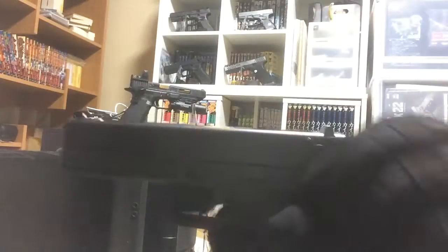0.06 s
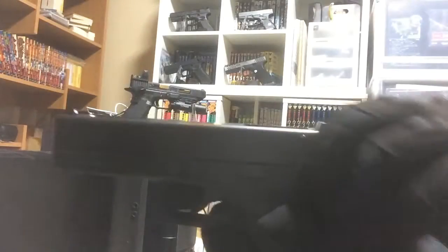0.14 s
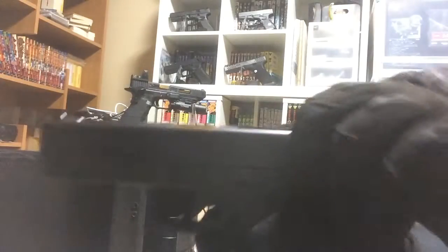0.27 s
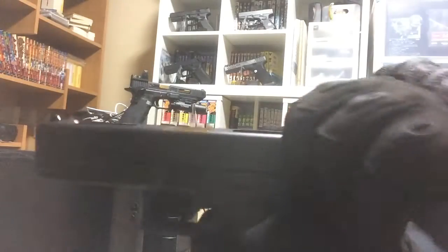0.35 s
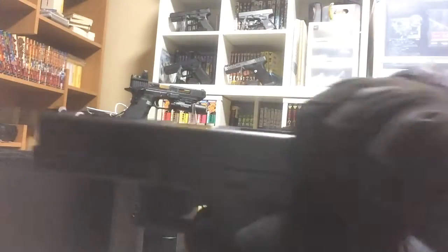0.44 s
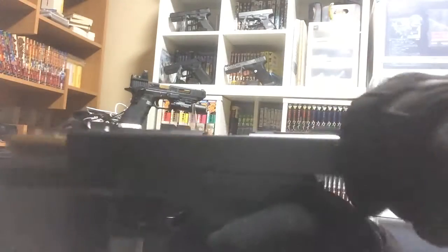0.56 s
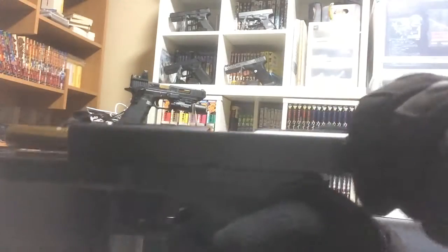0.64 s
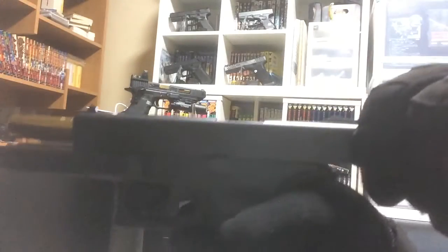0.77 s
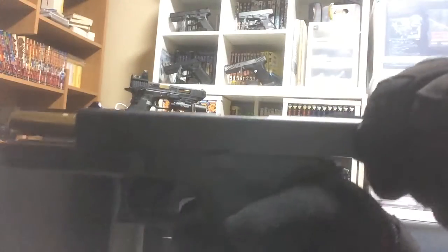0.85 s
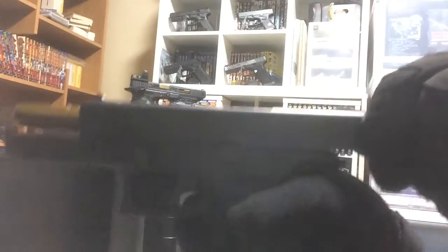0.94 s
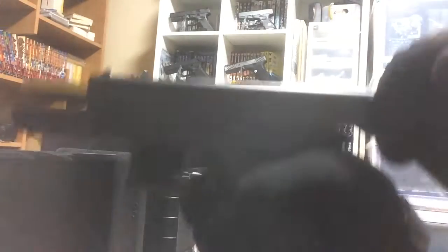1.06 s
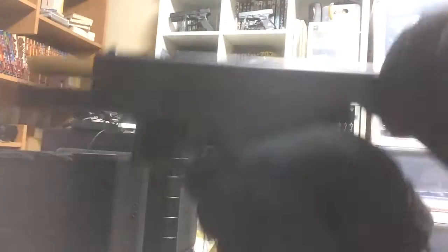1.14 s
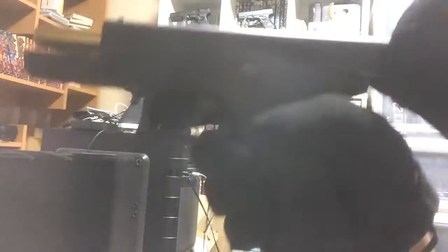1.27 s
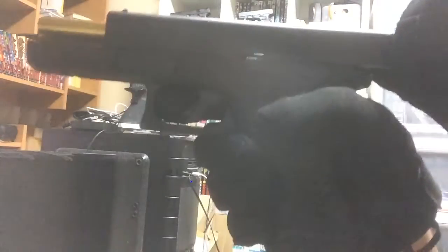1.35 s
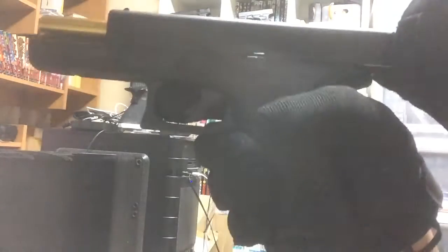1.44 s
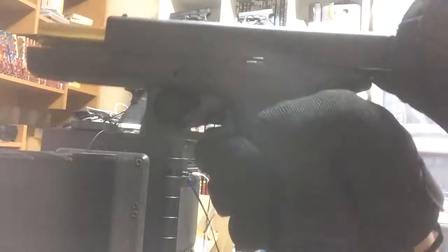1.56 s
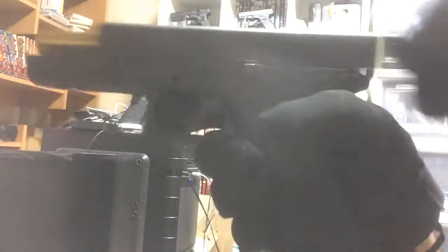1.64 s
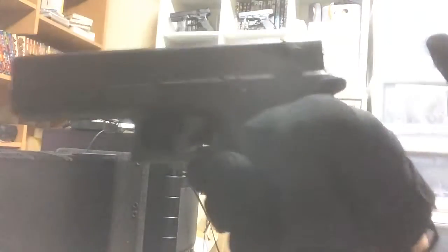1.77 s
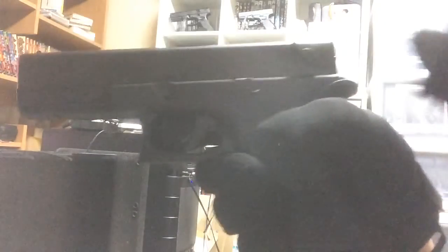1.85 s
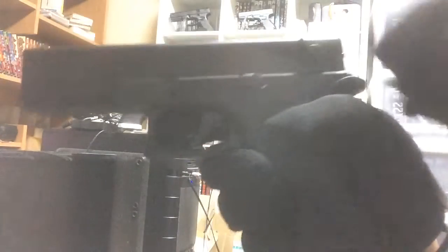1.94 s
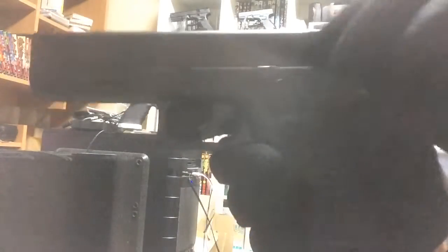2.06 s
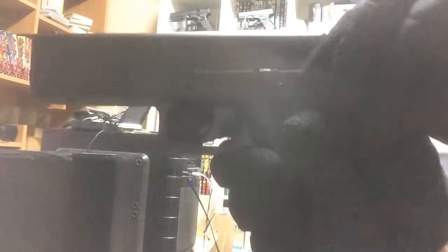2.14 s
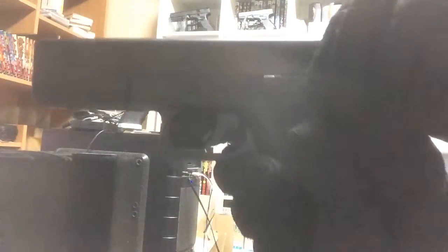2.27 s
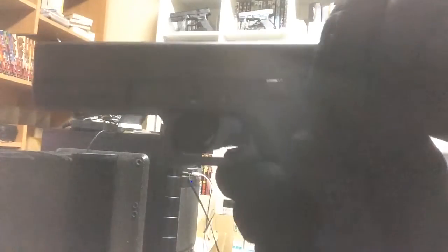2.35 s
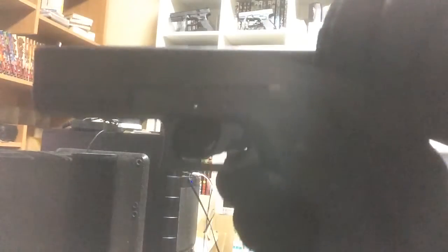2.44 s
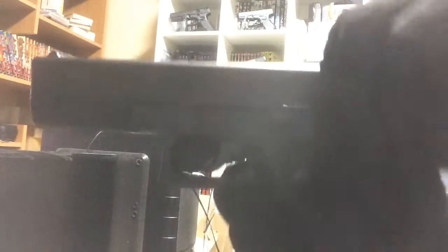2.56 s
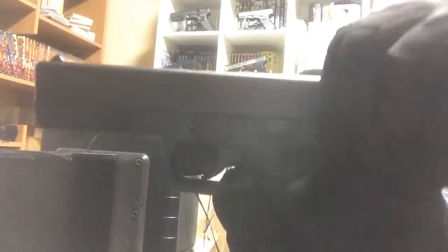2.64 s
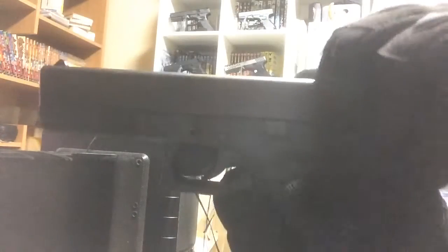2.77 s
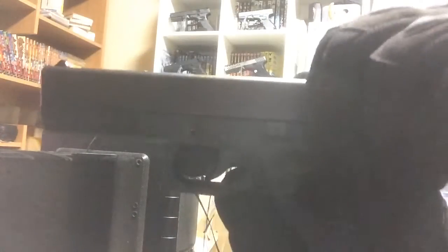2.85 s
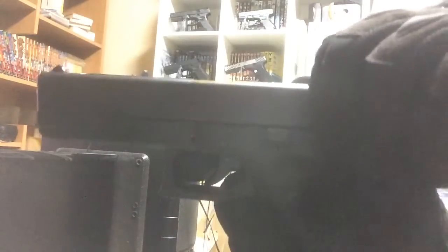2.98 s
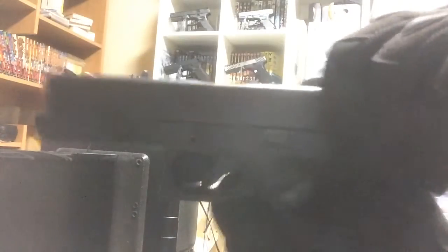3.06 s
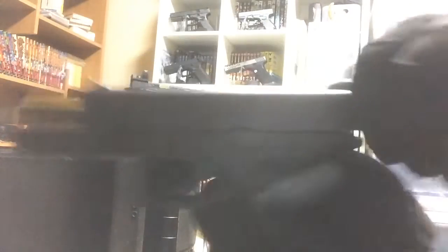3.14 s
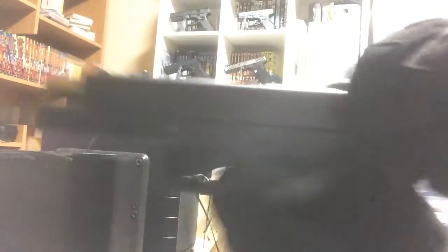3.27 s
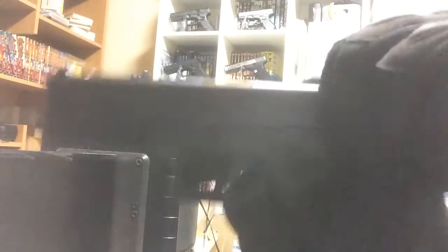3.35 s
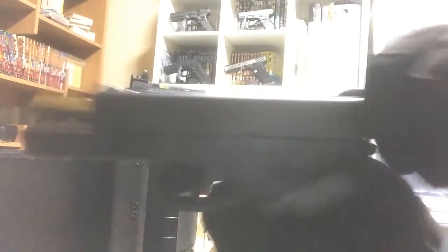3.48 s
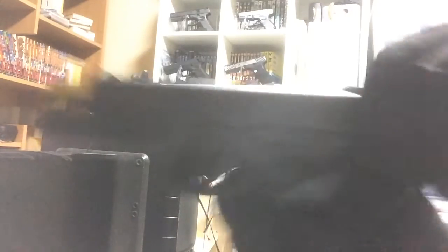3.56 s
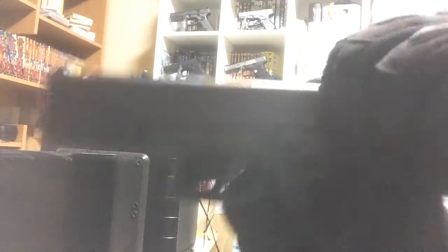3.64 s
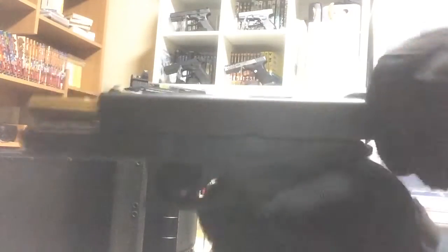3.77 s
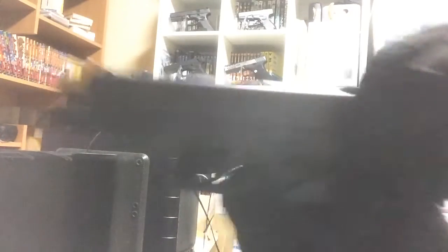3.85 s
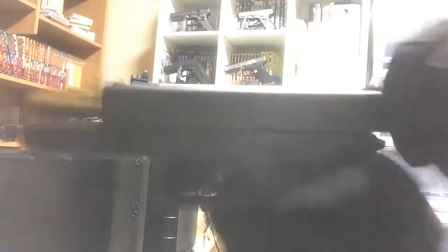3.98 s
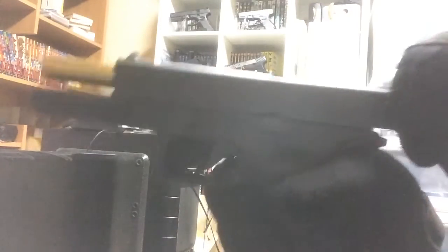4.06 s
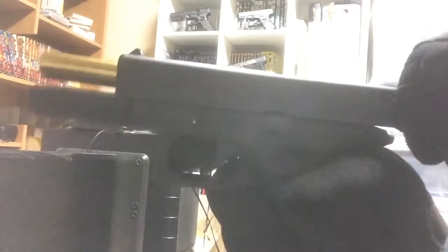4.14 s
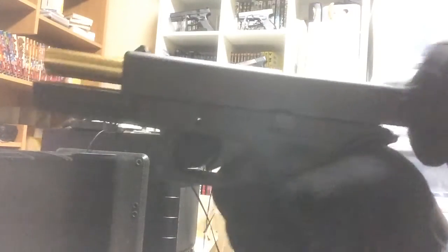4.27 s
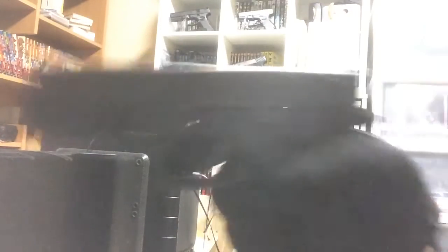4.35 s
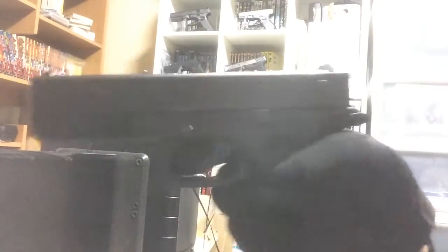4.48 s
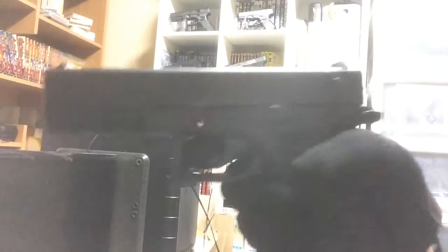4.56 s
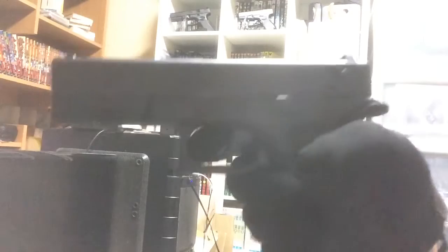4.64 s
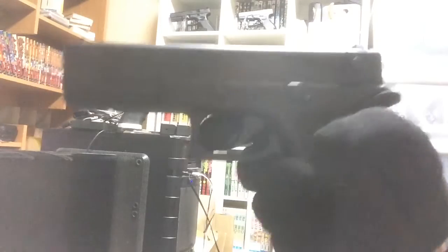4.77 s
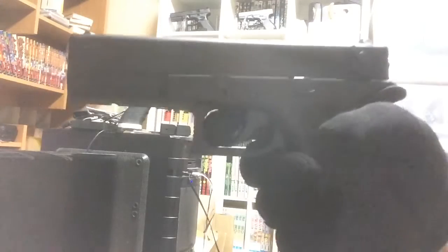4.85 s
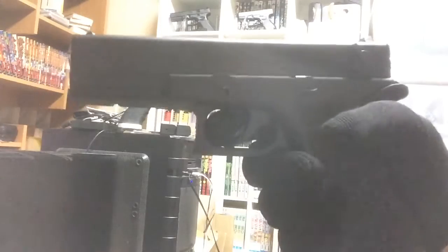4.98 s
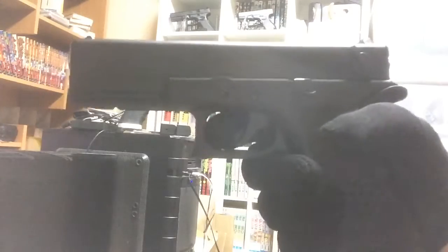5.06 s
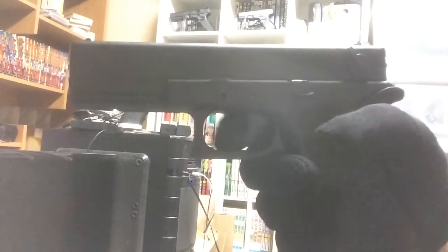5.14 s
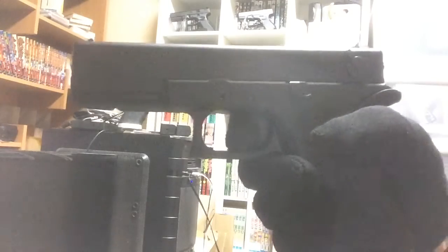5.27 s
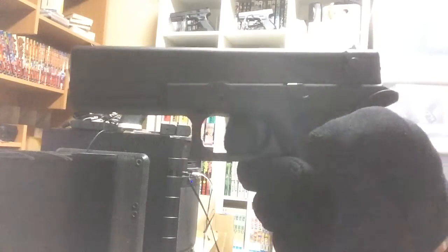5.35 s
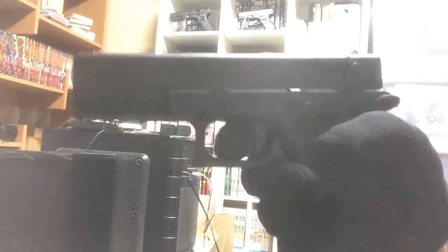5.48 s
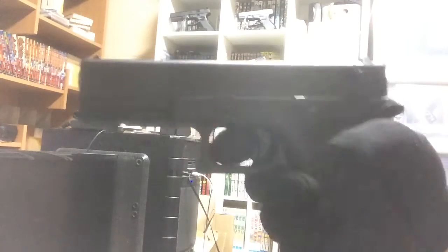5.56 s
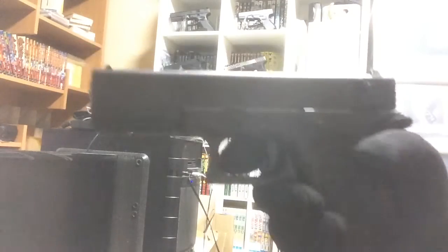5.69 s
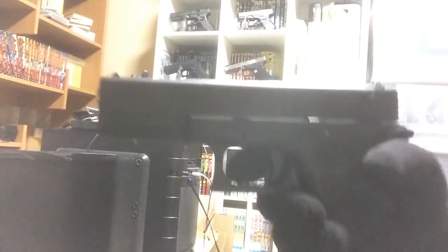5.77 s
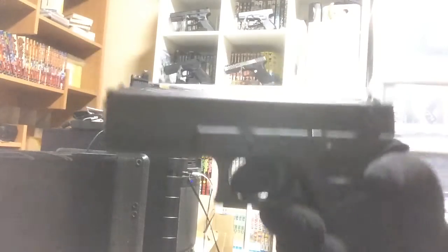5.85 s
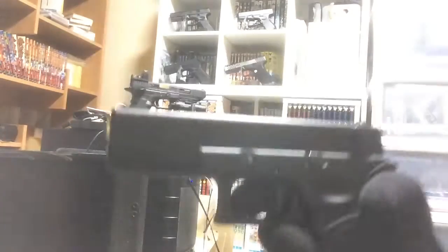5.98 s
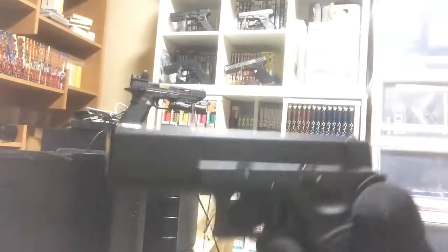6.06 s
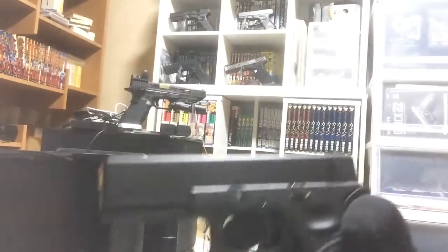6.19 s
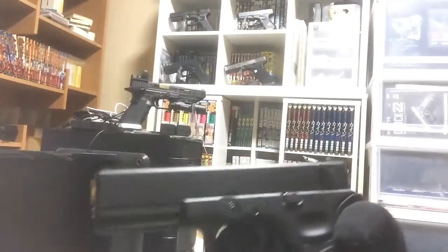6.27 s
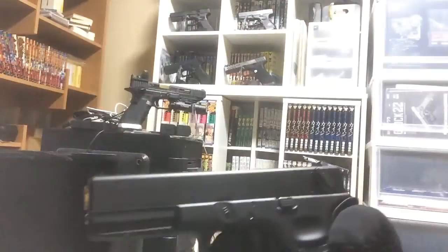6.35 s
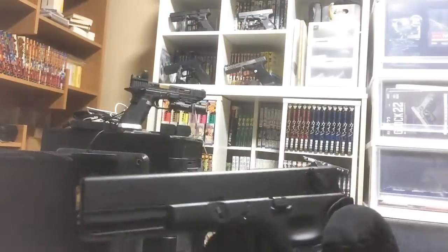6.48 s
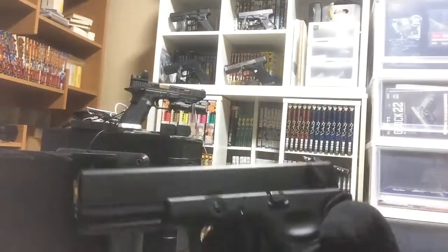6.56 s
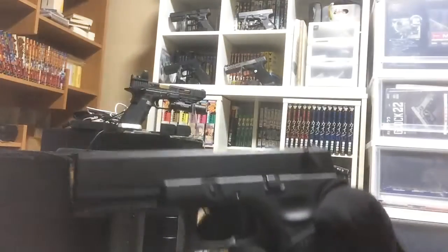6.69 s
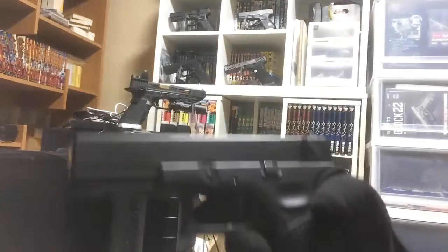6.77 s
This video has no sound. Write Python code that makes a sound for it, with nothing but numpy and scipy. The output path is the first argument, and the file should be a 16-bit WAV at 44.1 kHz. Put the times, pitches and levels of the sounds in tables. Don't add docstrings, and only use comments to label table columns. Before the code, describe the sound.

Close to a camera microphone, a gloved hand works a toy pistol: a scraping rack, a pause, a loud slam forward, another pause, then a rapid run of double clacks with ringing plastic and steel. One sharp hammer snap follows later. Short room echoes trail the hits, and the faint hum and hiss dip after each loud blow.

```python
import sys
import numpy as np
from scipy import signal
from scipy.fft import rfft, irfft
from scipy.io import wavfile
from scipy.ndimage import uniform_filter1d, minimum_filter1d

SR = 44100
rng = np.random.default_rng(int(sys.argv[2]) if len(sys.argv) > 2 else 0)


def gain_from_db(level_db):
    decades = np.asarray(level_db, float) / 20
    return 10 ** decades


def master_out(mix):
    frames = np.transpose(np.atleast_2d(mix))
    ceiling = np.clip(frames, -1, 1)
    pcm = np.round(ceiling * 32767).astype(np.int16)
    wavfile.write(sys.argv[1], SR, pcm)


N = 300762

# f/Hz, level/dB per Hz
AIR_SPECTRUM = [(15, -47.5), (25, -22), (65, -13), (266, -16.5), (339, -7.5), (368, -11.5), (510, -16),
                (669, -14), (3510, -30), (4240, -30), (4600, -34.5), (5130, -31.5), (11900, -40.5),
                (15200, -47), (16500, -60)]
# f/Hz, width/Hz, level/dB
FUZZY_TONES = [(98.5, 34, -78), (238, 16, -73), (340.5, 4.7, -66.5), (472, 34, -75.5), (690, 9.7, -75.5),
               (10800, 40, -92), (5100, 48, -90), (7400, 40, -92), (11800, 110, -94), (12700, 30, -98),
               (13100, 30, -99)]
# middle t/s, length/s, level/dB
RUBS_AND_SWELLS = [(0.24, 0.25, -61), (2.18, 0.046, -60), (2.318, 0.18, -63), (2.47, 0.1, -65),
                   (2.88, 0.053, -67), (4.922, 0.057, -61.5), (5.8, 0.13, -69), (6.058, 0.084, -64),
                   (0.542, 0.021, -49.5), (1.731, .03, -52.5), (3.135, 0.034, -52), (4.404, .02, -55.5),
                   (5.276, 0.055, -56), (5.515, 0.033, -59.5)]
# f/Hz, level/dB per Hz
RUB_SPECTRUM = [(800, 3), (2500, 2.5), (5000, -1), (9000, -8), (15000, -14)]
# f/Hz, level/dB per Hz
SELF_NOISE = [(1500, -21), (4000, 1), (16000, -10)]
# f/Hz, rarity/spreads
DROPOUTS = [(5000, 2.6), (8500, 1.5), (11000, 1.5), (12600, .9), (13400, .2), (14300, .9), (15500, .7)]

# f/Hz, level/dB, t60/s
FRAME_MODES = [(1180, -9, .014), (1335, -2, .022), (1560, -4, .016), (2090, 0, .016), (2260, -2, .022)]
# f/Hz, level/dB, t60/s
SLIDE_MODES = [(3031, -3, 0.0029), (3457, -5, 0.009), (3846, -0.5, 0.0084), (4526, 3.5, 0.0042),
               (5070, 0, 0.0045), (6070, -6, 0.0086), (6620, -11.5, 0.0013)]
# f/Hz, level/dB, t60/s
BARREL_MODES = [(7240, 0, .037), (7510, -11, .022), (7900, -11, .01)]
# f/Hz, level/dB, t60/s
SMALL_MODES = [(9800, -8, .01), (10600, -4, .018), (11200, -9, .015), (11900, 0, .02), (13150, -4, .022),
               (14530, -3, .024), (15500, -6, .014)]
CRACK_DB = [-3.5, 2, -21, -7.5]
# low f/Hz, high f/Hz
PART_BANDS = [(1180, 3720), (2600, 7200), (6600, 7600), (9000, 28000)]
DETUNE = [.025, .02, .002, .003]
# crack lost per barrel over slide, per part/(dB per dB)
LOOSENESS = [0, 0, 1.1, .8]

# t/s, slide level/dB, frame level/dB
TICKS = [(.5117, -39.5, -30.5), (.524, -44, -34), (.5393, -39, -36.5), (1.2863, -51, -48),
         (1.722, -62.5, -40), (2.042, -62, -69), (2.655, -56, -55), (3.1137, -58, -45.5),
         (3.132, -36.5, -33.5), (3.3678, -40.5, -29.5), (3.3774, -44, -37), (3.6251, -43, -40),
         (3.639, -31.5, -43.5), (3.9174, -39.5, -48.5), (3.9229, -34.5, -37.5), (4.3977, -38.5, -40),
         (4.406, -40, -33), (4.8354, -48, -39.5), (5.1853, -50, -62), (5.2623, -58, -37),
         (5.2943, -40, -40), (5.5095, -36, -39), (5.985, -62, -62), (6.158, -52, -50)]
# t/s, slide level/dB, frame level/dB, rattle/ms
CATCHES = [(.5495, -26, -31, 3), (.579, -7.5, -17.5, 4.1), (.6038, -12, -11, 2), (1.7398, -30, -40, 2),
           (1.7442, -24, -36.5, 1.7), (1.7547, -19.5, -13.5, 5), (3.1546, -38, -23, 1.7),
           (3.2182, -12, -13, 2), (3.223, -18.5, -16.5, 4.2), (3.3628, -28.5, -22, 2.9),
           (3.5386, -21.5, -29, 3.7), (3.5522, -13, -13, 2), (3.614, -36, -25.5, 4.6),
           (3.6594, -30.5, -18, 5.7), (3.8256, -14, -13, 2.8), (3.8519, -36.5, -22.5, 2.7),
           (3.9386, -27.5, -23.5, 3.7), (3.9415, -29.5, -15.5, 1.6), (4.0594, -14, -12, 2.5),
           (4.4145, -28.5, -28, 1.8), (4.418, -14.5, -21, 2.5), (4.429, -19.5, -11, 3),
           (4.4395, -13, -14, 1.6), (5.2791, -27, -26, 1.5), (5.306, -5, -4, 1.3)]
# t/s, slide level/dB, frame level/dB, rattle/ms
CLASHES = [(.5579, -19, -28, 5.3), (1.7635, -17, -21, 1.6), (1.7661, -11, -19, .9), (1.7738, -11, -11, 4.5),
           (1.777, -12.5, -14, 2.84), (3.1697, -20, -18, 4), (3.531, -18, -19, 4), (5.3092, -14, -15, 1),
           (3.8085, -17, -20, 4), (3.2385, -20, -18, 3), (3.2405, -13.5, -11.5, 3.5),
           (3.4145, -6.5, -5.5, 4.8), (3.4198, -6.5, -21, 2.5), (3.4237, -14, -13.5, 1.1),
           (3.4315, -28, -23.5, 2), (3.5203, -18.5, -19.5, 0.83), (3.5255, -16, -18, 2.5),
           (3.7062, -14, -13, 5.8), (3.7146, -14, -12, 3), (3.9757, -10, -10.5, 9.6),
           (3.982, -9, -6.5, 0.56), (3.9855, -15.5, -8.5, 1.6), (4.0384, -25, -24, 2.2),
           (4.052, -15, -24.5, 2.05), (4.4365, -15, -23.5, 3.1), (4.4455, -11.5, -7.5, 3.3),
           (4.449, -13, -13, 2.6), (4.4515, -15.5, -13.5, 1.18), (5.3035, -22, -23, 3.1)]
# t/s, slide level/dB, frame level/dB, rattle/ms
UNLOCKS = [(.5675, -23.5, -13.5, 5), (.572, -14.5, -21, 4.3), (3.1607, -31, -28, 3.3),
           (3.1742, -20, -25, 2), (3.179, -19, -24, 1), (3.183, -19, -21, 10), (3.2035, -36.5, -38, 3.5),
           (3.4089, -22.5, -19, 5.1), (3.5056, -35, -23, 2), (3.7, -30, -23.5, 5.4),
           (3.7958, -29.5, -21, 3.8), (3.8031, -19.5, -21, 3), (3.9717, -30.5, -26.5, 4.1),
           (4.0431, -16.5, -18.5, 1.6)]
# t/s, level/dB
CHATTER = [(.6337, -17.5), (.6508, -31), (.7305, -32.5), (.7608, -38.5), (3.2099, -27.5), (3.2571, -25.5),
           (3.2846, -30.5), (3.326, -31), (3.3359, -40), (3.3426, -34.5), (3.3847, -26.5), (3.3911, -25),
           (3.3997, -31), (3.545, -23.5), (3.5626, -35), (3.582, -32.5), (3.5905, -29), (3.6035, -30.5),
           (3.6447, -30), (3.6764, -27), (3.684, -32.5), (3.7828, -29), (3.819, -24.5), (3.859, -30),
           (3.9565, -29.5), (4.0308, -28), (4.076, -31), (4.0877, -33), (4.2295, -39.5), (.608, -22),
           (.618, -30), (3.5562, -22), (3.567, -27), (3.586, -27), (3.832, -23), (3.8375, -25),
           (3.863, -28), (3.8665, -29), (4.4212, -22), (4.08, -32)]
# t/s, slide level/dB, frame level/dB, rattle/ms
STOPS = [
    (0.6597, -4, -3, 2.2),
    (3.2687, -4.5, -4.5, 2.7),
    (3.877, -11, -13, 3.7),
    (4.092, -6.5, -6.5, 2),
]
# barrel over slide/dB, small parts over slide/dB
STEEL = dict(unlock=(8.5, 2.4), clash=(-7.5, -2), catch=(-19.5, -16), stop=(-12.5, -7.5),
         chatter=(-9, -7.5), tick=(-12.5, -17.5))
# t/s, frame f/Hz, slide f/Hz, barrel over slide/dB
LANDINGS = [(0.5506, 1940, 2700, -16), (0.5725, 1270, 4410, 12), (0.5801, 2590, 3360, -1),
            (0.6049, 1310, 4130, -16), (0.6353, 2140, 4500, -4), (0.6612, 2070, 3800, -4),
            (0.6712, 2310, 4910, -8), (1.7452, 1320, 6000, -12), (1.7559, 1220, 3080, -8),
            (1.767, 2220, 3140, -6), (1.7771, 990, 3460, -5), (3.1558, 2100, 2970, -16),
            (3.1626, 2010, 5740, 13), (3.1755, 2100, 6790, 9), (3.1804, 2190, 6730, 18),
            (3.2188, 1340, 2990, -13), (3.2414, 2190, 2940, -9), (3.2702, 2160, 3890, -9),
            (3.3657, 2110, 2700, -16), (3.3859, 2110, 3960, -7), (3.4183, 2050, 3510, -3),
            (3.4245, 2170, 5890, -4), (3.5076, 2010, 3170, 6), (3.5204, 1940, 5890, 0),
            (3.5266, 2390, 6200, 2), (3.553, 2280, 3080, -9), (3.5817, 2100, 2920, -13),
            (3.5915, 2160, 3280, -6), (3.6661, 1260, 2960, -12), (3.6777, 2300, 2810, -4),
            (3.7099, 960, 2950, -1), (3.7151, 2110, 4370, -4), (3.7839, 1980, 3090, 0),
            (3.7977, 2200, 4570, 3), (3.805, 1590, 3270, 10), (3.8265, 2270, 3120, -11),
            (3.8786, 2370, 3750, -9), (3.9433, 2080, 2700, -9), (3.9588, 1320, 3010, -10),
            (3.9793, 1930, 2810, -3), (4.0449, 2250, 3140, 14), (4.0523, 2510, 3290, 1),
            (4.0607, 1490, 2950, -14), (4.0938, 2070, 2820, -2), (4.4188, 2050, 6710, -9),
            (4.4302, 2110, 2700, -11), (4.4393, 1320, 4580, -5), (4.4517, 1520, 5200, -5),
            (5.2798, 1240, 3770, -15), (5.3069, 1920, 3830, -15),
            (.5125, 1300, 3000, -12), (.559, 2000, 4500, 2), (1.723, 950, 3000, -15),
                 (5.263, 1250, 3000, -15), (5.295, 1300, 6500, -12), (3.615, 1300, 4500, -10),
                 (3.532, 2000, 3400, -4), (3.1705, 2100, 5900, 4), (3.186, 1500, 3300, 14),
                 (3.8095, 1500, 3400, -5), (4.4465, 1500, 5200, -5)]

# t/s, level/dB, brightness/(dB per octave)
SLAMS = [(0.573, -25, -3), (.66, -27.5, 0.5), (1.777, -16.5, 0.6), (3.181, -28.5, -4.5), (3.27, -34, -0.8),
         (3.416, -24, 0.4), (3.554, -32, -6), (3.71, -24.5, 1.1), (3.828, -52.5, -2.7),
         (3.877, -40.5, -1.5), (3.978, -24, 0.5), (4.044, -29.5, -5), (4.095, -24, -0.2), (4.449, -16, 1.6),
         (5.304, -25.5, -3.5)]
# f/Hz, level/dB per Hz
ROOM_SPECTRUM = [(590, -39.5), (1000, -16), (2170, -3), (2770, -9.5), (3430, -6.5), (4090, -4), (7520, -5),
                 (8460, -8), (11900, -9.5), (15700, -16.5), (16500, -31)]
# f/Hz, t60/s
ROOM_T60 = [(500, 0.23), (1400, 0.17), (3700, 0.17), (9700, 0.13), (15000, 0.18)]
# from t/s, to t/s, level/dB
STROKES = [
    (0.545, 0.658, -34),
    (1.731, 1.778, -40.5),
    (3.157, 3.273, -30.5),
    (3.309, 3.417, -45.5),
    (3.496, 3.623, -29),
    (3.659, 3.7, -42),
    (3.779, 3.905, -31.5),
    (3.922, 3.97, -41),
    (4.011, 4.078, -39.5),
    (4.403, 4.437, -33),
]
# t/s, signed peak
SNAPS = [
    (.6044, .9),
    (3.2183, .9),
    (3.5524, .75),
    (3.826, .75),
    (4.0597, .8),
    (5.3066, -.7),
]
# t/s, signed puff peak, signed knock peak, knock f/Hz, knock/ms
PUSHES = [(0.66, 0.23, 0.17, 532, 1.53), (1.779, -0.0092, -0.57, 527, 1), (3.269, -.01, 0.02, 297, 2.5),
          (3.4163, 0.3, 0.12, 600, 1.3), (3.71, 0.2, -0.85, 450, 0.7), (3.707, .05, .25, 700, 1.2),
          (3.715, 0.02, -.25, 900, .7), (3.4243, -.05, -.35, 800, .8), (4.4478, -.05, -.4, 900, .8),
          (1.7765, .03, .3, 1000, 1), (3.982, -0.3, 0.38, 240, 3.3), (4.093, .04, 0.03, 565, 1.9),
          (4.4512, -0.33, 0.85, 620, 0.9), (5.3073, 0.37, 0.04, 498, 2.5)]


def evened(x):
    return x / np.sqrt(np.mean(x ** 2) + 1e-20)


def read(points, hz):
    f, value = np.transpose(points)
    return np.interp(np.log(hz + 1), np.log(f + 1), value)


def add(mix, s, sound):
    stretch = mix[round(s * SR):][:len(sound)]
    stretch += sound[:len(stretch)]


def noise(spectrum, count, patchy_db=0., t60=None):
    hz = np.fft.rfftfreq(512, 1 / SR)
    t = np.arange(count // 128 + 5) * 128 / SR
    a, b, patches = rng.standard_normal((3, len(hz), len(t)))
    patches = uniform_filter1d(uniform_filter1d(patches, size=8, axis=0), size=24, axis=1)
    db = read(spectrum, hz)[:, None] + patchy_db * evened(patches)

    def sounded(db):
        return signal.istft((a + 1j * b) * gain_from_db(db), nperseg=512, noverlap=384)[1]

    steady = np.std(sounded(db))
    if t60:
        db = db - 60 * t / read(t60, hz)[:, None]
    return sounded(db)[:count] / steady


def background():
    t = np.arange(N) / SR
    out = gain_from_db(-61) * noise(AIR_SPECTRUM, N, 1.1)
    for hz, width, db in FUZZY_TONES:
        r = np.exp(-np.pi * width / SR)
        slow = signal.lfilter([1 - r], [1, -r], rng.standard_normal((2, N)))
        steady = 2.2 * slow.std()
        tone = (slow[0] + steady) * np.cos(2 * np.pi * hz * t) + slow[1] * np.sin(2 * np.pi * hz * t)
        out += gain_from_db(db) * evened(tone)
    rubs = sum(gain_from_db(db) * np.exp(-(1.9 * (t - s) / length) ** 2) for s, length, db in RUBS_AND_SWELLS)
    return out + rubs * noise(RUB_SPECTRUM, N, 2.6)


def contacts():
    bounces = [(s + .0085, slide - 11.5, frame - 14, 4.5) for s, slide, frame, _ in STOPS]
    kinds = dict(unlock=UNLOCKS, clash=CLASHES, catch=CATCHES, stop=STOPS + bounces,
                 chatter=[(s, db, db + 0.5, 2.3) for s, db in CHATTER],
                 tick=[(*row, 2.4) for row in TICKS])
    rows = []
    for kind, hits in kinds.items():
        barrel, small = STEEL[kind]
        rows += [(s, frame, slide, slide + barrel, slide + small, ms) for s, slide, frame, ms in hits]
    return rows


def landing(s):
    rows = np.array(LANDINGS)
    apart = abs(s + .001 - rows[:, 0])
    return rows[apart.argmin(1), 1:].T[..., None], apart.min(1, keepdims=True) < .005


def struck_part(rattles, modes, chance, crack_db, band_hz, detune, free, spot=None):
    hz = np.fft.rfftfreq(4096, 1 / SR)
    edges = np.clip(band_hz, 20, SR / 2 - 100)
    band = signal.sosfreqz(signal.butter(4, edges, "band", fs=SR, output="sos"), hz, fs=SR)[1]

    def resonance(f, t60):
        return f / (f ** 2 - hz ** 2 + 2.2j * hz / (t60 * free))

    response = 0
    for k, (f, db, t60) in enumerate(modes):
        f = f * (1 + detune * chance[:, k, 1, None])
        if spot:
            db = db - 9 * spot[1] * abs(np.log2(f / spot[0]))
        response = response + gain_from_db(db + 4 * chance[:, k, 0, None]) * resonance(f, t60)
    if spot:
        f, known, t60 = spot
        response = response + known * gain_from_db(0.5) * resonance(f, t60)

    def levelled(h):
        v = irfft(rfft(rattles, 4096) * band * h)
        return v / np.sqrt(uniform_filter1d(v ** 2, size=90).max(1, keepdims=True))

    ring, crack = levelled(response), levelled(1)
    return (ring + gain_from_db(crack_db) * crack) / np.sqrt(1 + gain_from_db(2 * crack_db))


def pistol():
    out, t = np.zeros(N), np.arange(900) / SR
    hits = contacts()
    s, *dbs, ms = np.transpose(hits)[..., None]
    grit = rng.standard_normal((len(hits), 2, 900))
    chance = rng.standard_normal((len(hits), 4, 8, 2))
    ms = np.maximum(ms, .4)
    spikes = grit[:, 0] * gain_from_db(3.5 * grit[:, 1])
    rise = 1 - np.exp(-t / (ms * 0.000047))
    rattles = spikes * rise * np.exp(-(t / (ms * 0.00075)) ** 1.2)
    rattles[:, 8] += -40.0 / ms[:, 0] ** 2

    (*spots, barrel_db), known = landing(s)
    shift_db = known * (dbs[1] + barrel_db - 2.5 - dbs[2])
    dbs[2] = dbs[2] + shift_db
    dbs[3] = dbs[3] + .4 * shift_db + .8
    loose_db = np.clip(dbs[2] - dbs[1] - 1.5, -16, 8)

    layers = [gain_from_db(dbs[0] - 26.0) * struck_part(rattles, FRAME_MODES, chance[:, 0], 30, (500, 1100), 0, 1)]
    spot_t60 = .013, .009
    for k, modes in enumerate((FRAME_MODES, SLIDE_MODES, BARREL_MODES, SMALL_MODES)):
        in_hand = k < 2
        held_db = np.clip(dbs[k] + 28, -20, 0) * in_hand
        crack_db = CRACK_DB[k] - LOOSENESS[k] * loose_db - held_db
        free = gain_from_db(LOOSENESS[k] * np.minimum(loose_db, 0) + held_db / 2)
        spot = (spots[k], known, spot_t60[k]) if in_hand else None
        sounds = struck_part(rattles, modes, chance[:, k], crack_db, PART_BANDS[k], DETUNE[k], free, spot)
        layers.append(gain_from_db(dbs[k] - 3.5) * sounds)
    for sounds in layers:
        for at, sound in zip(s[:, 0], sounds):
            add(out, at, sound)
    return out


def metal(dry_share):
    t = np.arange(2000) / SR
    ring = np.zeros(len(t))
    for hz, db, t60 in FRAME_MODES + SLIDE_MODES + BARREL_MODES + SMALL_MODES:
        ring += gain_from_db(db - 60 * t / t60) * np.sin(2 * np.pi * hz * t) / np.sqrt(t60)
    ring[0] = dry_share * np.linalg.norm(ring)
    return ring / np.linalg.norm(ring)


def room(x):
    t = np.arange(12000) / SR
    echoes = noise([(300, -22.5), (1100, -4), (16000, -4.0)], len(t), 0., ROOM_T60)
    echoes = echoes * np.clip(t / 0.00049, 0, 1)
    out = gain_from_db(-12.5) * signal.fftconvolve(x, echoes / np.linalg.norm(echoes))[:N]
    struck = metal(3.5)
    swell = 1 - np.exp(-t / 0.0077)
    for s, db, tilt_db in SLAMS:
        colour = [(hz, v + tilt_db * np.log2(hz / 3000)) for hz, v in ROOM_SPECTRUM]
        tail = signal.fftconvolve(noise(colour, len(t), 2.5, ROOM_T60), struck)[:len(t)]
        add(out, s, gain_from_db(db + 5.0) * swell * tail)
    return out


def scrape():
    slips = np.zeros(N)
    for s, end, db in STROKES:
        a, b = rng.standard_normal((2, round((end - s) * SR)))
        uneven = evened(a * gain_from_db(3.2 * evened(uniform_filter1d(b, size=40))))
        add(slips, s, gain_from_db(db) * uneven * signal.windows.tukey(len(a), .6))
    thin = signal.butter(4, [1400, 10000], "band", fs=SR, output="sos")
    return signal.sosfilt(thin, signal.oaconvolve(slips, metal(0.9))[:N])


def snaps():
    out, u = np.zeros(N), np.arange(-40, 41) * 1000 / SR / .1
    for s, peak in SNAPS:
        add(out, s - 40 / SR, -2.3 * peak * u * np.exp(-u ** 2))
    return signal.sosfiltfilt(signal.butter(2, 1000, "high", fs=SR, output="sos"), out)


def pushes():
    out, t = np.zeros(N), np.arange(-800, 801) / SR
    dip = np.exp(-(t / .0115) ** 6)
    puff_ms, jolt_ms, jolt_spread_ms, jolt_share = 0.82, .25, 5, .2
    for s, puff, knock, hz, ms in PUSHES:
        when, size = rng.uniform(-1, 1, (2, 4, 1))
        u = (1000 * t - jolt_spread_ms * when) / jolt_ms
        jolts = (np.sign(size) * 2 * u * np.exp(-u ** 2)).sum(0)
        thud = np.exp(-(1000 * t / ms) ** 2) * np.cos(2 * np.pi * hz * t)
        push = puff * np.exp(-(1000 * t / puff_ms) ** 2) + knock * (thud + jolt_share * jolts)
        add(out, s + t[0], push - dip * push.sum() / dip.sum())
    return out


def ducking(x):
    loud = uniform_filter1d(x ** 2, size=200) > gain_from_db(-42)
    last_loud = np.maximum.accumulate(np.where(loud, np.arange(N), -SR))
    since = (np.arange(N) - last_loud) / SR
    down_db = -8.3 * np.clip((.262 - since) / 0.05, 0, 1)
    return gain_from_db(uniform_filter1d(down_db, size=3001, origin=1500))


def dropouts(x):
    hz, _, z = signal.stft(x, SR, nperseg=1024)
    field = rng.standard_normal(z.shape[1:])
    field = evened(uniform_filter1d(uniform_filter1d(field, size=5, axis=0), size=9, axis=1))
    holes = field > read(DROPOUTS, hz)[:, None]
    return signal.istft(z * gain_from_db(-15 * holes), SR, nperseg=1024)[1][:, :N]


def scene():
    gun = pistol() + scrape() + snaps()
    return (gun + pushes() + room(gun) + background() * ducking(gun))[None]


def low_pass(x):
    return signal.sosfilt(signal.butter(12, 16960, fs=SR, output="sos"), x)


def record(dry):
    x = dropouts(dry + gain_from_db(-80.5) * noise(SELF_NOISE, N))
    x = signal.sosfiltfilt(signal.butter(2, 35, "high", fs=SR, output="sos"), x)
    gain = minimum_filter1d(np.minimum(1, .96 / (abs(x) + 1e-9)), size=61)
    x = x * uniform_filter1d(gain, size=61)
    band_limit = signal.firwin(255, 16100, window=("kaiser", 8), fs=SR)
    return low_pass(signal.oaconvolve(x, band_limit[None], "same"))


dry = scene()
out = record(dry)
master_out(out)
```